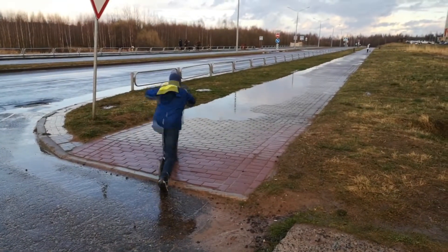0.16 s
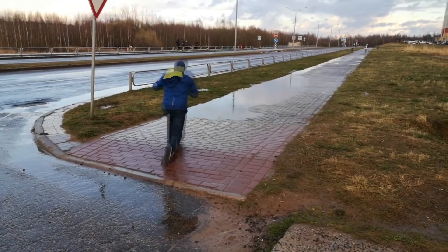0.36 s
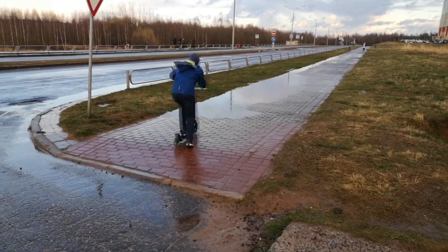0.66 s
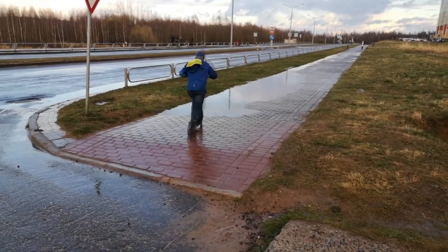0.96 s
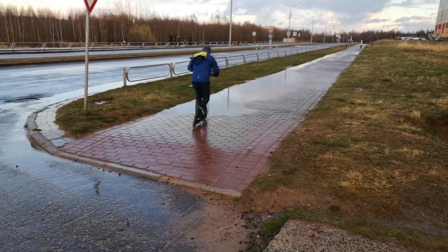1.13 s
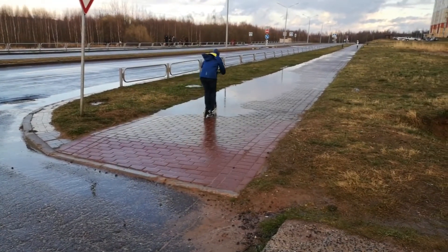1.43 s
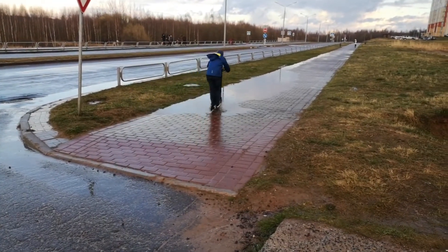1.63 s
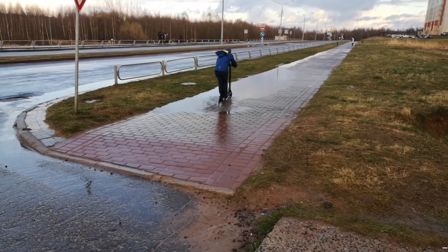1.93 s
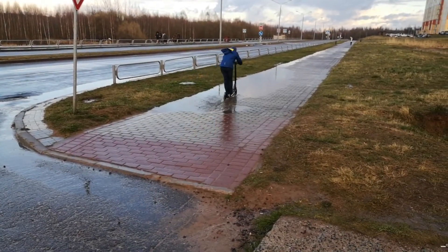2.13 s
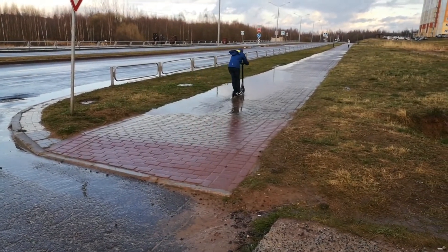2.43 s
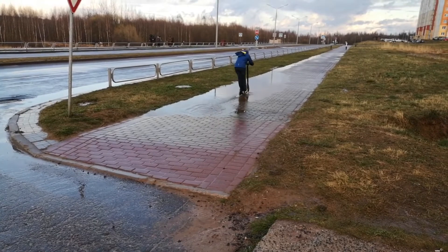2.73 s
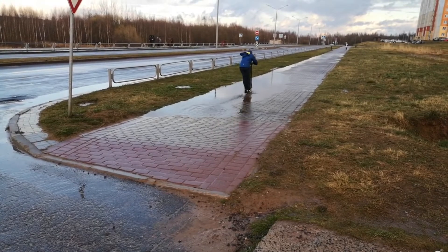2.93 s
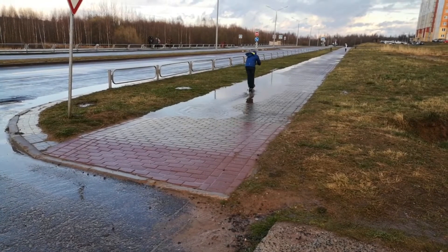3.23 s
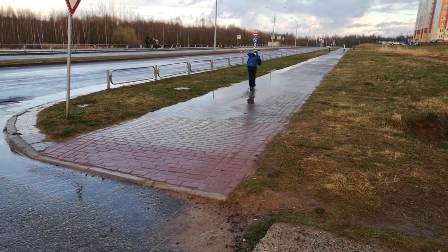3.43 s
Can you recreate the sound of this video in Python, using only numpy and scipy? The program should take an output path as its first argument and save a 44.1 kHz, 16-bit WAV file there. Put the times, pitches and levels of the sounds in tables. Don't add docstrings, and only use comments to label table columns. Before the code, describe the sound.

Kick scooter's small hard wheels rattle over wet paving blocks outdoors, moving away from the microphone

```python
import sys
import numpy as np
from scipy import signal
from scipy.fft import rfft, irfft
from scipy.io import wavfile
from scipy.ndimage import uniform_filter1d

SR = 44100
rng = np.random.default_rng(int(sys.argv[2]) if len(sys.argv) > 2 else 0)


def wav_out(sig):
    wavfile.write(sys.argv[1], SR, np.round(np.clip(np.atleast_2d(sig).T, -1, 1) * 32767).astype(np.int16))


def how_loud(loudness_db):
    steps = np.asarray(loudness_db, float) / 20
    return 10 ** steps


N = 157437
CLICKS_PER_S, CLICK_SCATTER_DB, BIGGEST_CLICK_DB = 3000, 4.5, 11


def curve(table, col):
    rows = np.array(table)
    return np.interp(np.arange(N) / SR, rows[:, 0], rows[:, col])


def shape(table):
    rows = np.array(table)
    log_hz = np.log(np.arange(N // 2 + 1) * SR / N + 1)
    return how_loud(np.interp(log_hz, np.log(rows[:, 0]), rows[:, 1]))


def unit(x):
    return x / np.sqrt(np.mean(x ** 2))


def colour(x, table):
    below = (table[0][0] / 2, table[0][1] - 30)
    above = (table[-1][0] * 2, table[-1][1] - 40)
    return unit(irfft(rfft(x) * shape([below] + list(table) + [above]), N))


def walk(rate_hz):
    hold = int(SR / rate_hz)
    steps = np.repeat(rng.standard_normal(N // hold + 1), hold)
    return 1.3 * uniform_filter1d(uniform_filter1d(steps, hold), hold)[:N]


def clicks(rate_hz, scatter_db):
    hit, sign, size = rng.random((3, 2, N))
    size_db = np.minimum(-scatter_db * np.log(1 - size), BIGGEST_CLICK_DB)
    return unit((hit < rate_hz / SR) * np.sign(sign - .5) * how_loud(size_db))


def treble(x, hz):
    kind = "low" if np.isscalar(hz) else "band"
    return signal.sosfilt(signal.butter(2, hz, kind, fs=SR, output="sos"), x)


# f/Hz, level/dB
AIR = [(200, 34), (650, 18), (1840, -60), (4260, -43), (15000, -6)]


def far_road():
    return colour(rng.standard_normal((2, N)), AIR) * how_loud(-63.5 + walk(2.5))


# f/Hz, level/dB
WIND = [(18, -4), (45, 4), (70, -3.5), (130, -15), (220, -31.5)]
# t/s, level/dB
GUST = [(0, -42), (.07, -54), (.15, -46), (.39, -38.5), (.48, -47), (.55, -41.5), (.88, -37.5),
        (.96, -50.5), (1.27, -36), (1.45, -41.5), (1.8, -45.5), (2.05, -34), (2.14, -48), (2.36, -33),
        (2.45, -49.5), (2.76, -32), (2.92, -34.5), (3.33, -48)]


def wind():
    puffs = colour(rng.standard_normal((2, N)), WIND)
    level = np.sqrt(uniform_filter1d(puffs ** 2, SR // 5))
    return puffs / level * how_loud(curve(GUST, 1) + 2.0 * walk(24.92))


# t/s, level/dB, f/Hz
SINGING = [
    (1.435, -39, 820),
    (2.049, -39, 2470),
    (2.42, -47, 1080),
]


def singing():
    fall_s = 0.011
    t, out = np.arange(N) / SR, 0
    for at, db, hz in SINGING:
        env = (t > at) * np.exp(-np.maximum(t - at, 0) / fall_s)
        scrape = treble(clicks(CLICKS_PER_S, CLICK_SCATTER_DB), [hz / 1.2, hz * 1.2])
        out = out + how_loud(db) * env * unit(scrape)
    return out


def blows(table, cycles, crack_db):
    crack_s, crack_hz = 0.0011, 6000
    out, t = np.zeros((2, N + SR)), np.arange(SR // 8) / SR
    for at, db, hz in table:
        turn = 2 * np.pi * hz * t
        env = np.exp(-hz * t / cycles) * np.minimum(hz * t, 1)
        body = env * np.array([np.sin(turn), np.cos(turn)])
        crack = how_loud(crack_db) * np.exp(-t / crack_s) * rng.standard_normal((2, len(t)))
        i = int(at * SR)
        out[:, i:i + len(t)] += how_loud(db - 6) * (body + treble(crack, crack_hz))
    return out[:, :N]


# t/s, peak level/dB, f/Hz
TICKS = [
    (2.158, -28, 2000),
    (2.26, -23.5, 800),
    (2.696, -27, 1800),
    (2.749, -22, 1200),
    (2.845, -30, 1800),
    (2.296, -33, 8000),
]


def grit_ticks():
    return blows(TICKS, cycles=0.79, crack_db=-5)


# t/s, peak level/dB, f/Hz
THUMPS = [
    (.225, -33, 180),
    (.563, -30, 281),
    (.842, -24.5, 152),
    (.9, -32.5, 133.6),
    (1.26, -34.5, 159),
    (1.4, -37.5, 262.5),
    (1.502, -29.5, 147),
    (1.85, -29, 105),
    (3.139, -40, 197),
]


def deck_thumps():
    return blows(THUMPS, cycles=4.15, crack_db=-60)


# t/s, peak level/dB, f/Hz
KNOCKS = [(0.135, -19, 1904), (0.236, -16.5, 2123), (0.485, -40, 2450), (0.501, -26.5, 1620),
          (0.571, -21.5, 3230), (0.606, -19, 1620), (0.658, -22.5, 3520), (0.689, -22, 3830),
          (0.712, -21.5, 3800), (0.739, -28.5, 2580), (0.804, -32, 5920), (0.91, -18, 4970),
          (1.0, -32, 1760), (1.11, -27, 1720), (1.196, -24, 1550), (1.205, -20, 1840), (1.233, -19, 2470),
          (1.272, -23, 1830), (1.304, -15, 1616), (1.337, -11, 5550), (1.369, -34, 1480),
          (1.408, -20, 1570), (1.432, -27, 845), (1.45, -20, 1540), (1.551, -22, 1750), (1.586, -25, 1570),
          (1.622, -27.5, 2720), (1.644, -22.5, 2705), (1.694, -24, 2660), (1.705, -20, 2000),
          (1.793, -26, 2850), (1.837, -23, 1943), (1.882, -21, 2440), (1.915, -32.5, 1190),
          (1.956, -25, 1900), (2.159, -40, 1610), (2.225, -39, 1780), (2.247, -26.5, 1840),
          (2.258, -34, 1865), (2.297, -37, 1790), (2.309, -36, 1746), (2.346, -33, 2570),
          (2.364, -32, 1870), (2.385, -30, 1880), (2.696, -32.5, 2473), (2.75, -32.5, 1190),
          (2.77, -31, 2530), (2.818, -31, 2470), (2.845, -39, 1860), (2.872, -45, 2650), (3.068, -39, 2560),
          (3.152, -37, 2640), (3.192, -29.5, 1700), (3.516, -29, 1280)]


def edge_knocks():
    return blows(KNOCKS, cycles=5.95, crack_db=-10)


# t/s, rolling level/dB, deck drumming level/dB
ROLL = [(0, -42, -44), (.23, -51, -41.5), (.54, -49.5, -54), (.6, -31, -60), (.76, -37, -49),
        (.89, -56, -33.5), (.96, -47, -46.5), (1.25, -37.5, -40.5), (1.8, -35, -40.5), (2.08, -33.5, -56),
        (2.16, -40.5, -42.5), (2.35, -36.5, -56), (2.85, -37.5, -53), (3.36, -42, -53), (3.57, -40, -44.5)]


def rolling():
    chips_per_s, scatter_db, chip_s, chip_db = 150, 9, 0.0014, -3.5
    hits = np.abs(clicks(chips_per_s, scatter_db)[0])
    chips = unit(signal.lfilter([1], [1, -np.exp(-1 / (chip_s * SR))], hits))
    return how_loud(curve(ROLL, 1) - 4.5) * (how_loud(2.4 * walk(30.0)) + how_loud(chip_db) * chips)


# f/Hz, level/dB
DECK = [(80, -4.5), (125, 2), (200, -7), (290, -9.5), (380, -20)]


def deck(low):
    thud = how_loud(-24.5) * uniform_filter1d(low, int(0.017 * SR))
    drum = how_loud(curve(ROLL, 2) - 9 + 4.2 * walk(10))
    return colour(rng.standard_normal((2, N)), DECK) * (drum + thud)


# f/Hz, level/dB
GRIT = [(500, -16.5), (1600, 6.5), (2900, -5.5), (5500, -1.5), (9300, -5.5), (10200, -9.5), (15000, -30)]


def grit_and_spray(low, bright):
    split_hz, patch_db = 3820, 2.6
    grit = colour(clicks(9000, 3.7), GRIT)
    edges_hz = split_hz * 1.1 ** np.arange(17)
    spray = 0
    for pair in zip(edges_hz, edges_hz[1:]):
        spray = spray + treble(grit, pair) * how_loud(patch_db * walk(90))
    return how_loud(-18) * low * treble(grit, split_hz) + how_loud(-4.5) * bright * unit(spray)


# t/s, peak level/dB, brightness level/dB, rattle length/s
JOLTS = [(0.096, -43, -17, 0.032), (0.132, -21.5, -24, 0.013), (0.16, -28.5, -15.5, 0.055),
         (0.224, -14, -18.5, 0.019), (0.267, -32.5, -28, 0.021), (0.28, -33.5, -12.5, 0.021),
         (0.37, -43, -12, 0.037), (0.448, -31.5, -15, 0.007), (0.499, -27, -18.5, 0.019),
         (0.57, -23, -8, 0.016), (0.608, -18.5, -15.5, 0.014), (0.654, -25.5, -8, 0.014),
         (0.682, -32.5, -0.5, 0.0079), (0.715, -26, -12, 0.0078), (0.737, -25.5, -12, 0.037),
         (0.801, -28.5, -11, 0.022), (0.843, -32, -9, 0.061), (0.878, -30, -15.5, 0.019),
         (0.909, -24, -12.5, 0.014), (1.001, -23, -22, 0.011), (1.06, -27, -12.5, 0.016),
         (1.108, -23.5, -15, 0.014), (1.153, -26.5, -9, 0.015),
         (1.194, -17, -17.5, 0.0093), (1.203, -18.5, -12.5, 0.0062), (1.232, -11.5, -16.5, 0.011),
              (1.269, -16.5, -13, 0.0093), (1.304, -8.5, -17.5, 0.0077), (1.338, -19.5, -9.5, 0.009),
              (1.367, -15, -18, 0.0056), (1.405, -14.5, -13, 0.0066), (1.43, -19, -16, 0.0094),
              (1.447, -23.5, -19.5, 0.012), (1.509, -32.5, -17, 0.046), (1.552, -18.5, -14, 0.014),
              (1.586, -19.5, -19.5, 0.02), (1.619, -17.5, -22.5, 0.016), (1.642, -12.5, -15.5, 0.0099),
              (1.689, -20.5, -19, 0.008), (1.695, -17.5, -10, 0.0063), (1.703, -14.5, -21, 0.014),
              (1.755, -26.5, -11.5, 0.014), (1.791, -18, -13.5, 0.0074), (1.836, -16.5, -16.5, 0.003),
              (1.881, -15.5, -13.5, 0.0066), (1.913, -42, 4, 0.0088), (1.954, -29, -10, 0.02),
              (1.986, -20.5, -14, 0.011), (2.039, -20, -17, 0.0078), (2.157, -26.5, -14, 0.0027),
         (2.226, -30.5, -6.5, 0.0079), (2.247, -32.5, -14, 0.022), (2.295, -32.5, -7.5, 0.023),
             (2.345, -31.5, -15.5, 0.0164), (2.383, -36.5, -12, 0.0065), (2.56, -29.5, -12.5, 0.0088),
             (2.641, -37, -16.5, 0.025), (2.693, -29, -21, 0.015), (2.746, -28.5, -27, 0.0039),
             (2.772, -37, -8.5, 0.017), (2.819, -31.5, -4, 0.0038), (2.872, -31, -13.5, 0.016),
             (3.15, -26.5, -16, 0.0066), (3.192, -25, -21.5, 0.0086), (3.47, -19, -20, 0.002),
             (3.509, -22.5, -54, 0.0045)]


def jolts():
    attack_s, fall_power = .0012, 1.3
    bright_attack_s, bright_fall_power = .0025, 1.44
    tail_db, tail_s = -21, 0.047
    low, bright, new = np.zeros(N), np.zeros(N), np.zeros(N, int)
    t = np.arange(SR // 5) / SR
    tail = how_loud(tail_db) * np.exp(-t / tail_s)
    for at, db, bright_db, length_s in JOLTS:
        i, age = int(at * SR), t / max(length_s, .002)
        knock = (1 - np.exp(-t / attack_s)) * (np.exp(-age ** fall_power) + tail)
        bright_fall = np.exp(-(age / 1.03) ** bright_fall_power)
        jingle = (1 - np.exp(-t / bright_attack_s)) * (bright_fall + tail)
        low[i:i + len(t)] += how_loud(db) * knock[:N - i]
        bright[i:i + len(t)] += how_loud(db + bright_db) * jingle[:N - i]
        new[i] = 1
    settlings = np.arange(N) // (SR // 20)
    return low, bright, np.cumsum(new) + settlings


def ring(env, modes, which):
    mode_scatter_db, together, longest_t60_s = 3, 0.24, .06
    luck = rng.standard_normal((512, len(modes)))
    taps, out = clicks(CLICKS_PER_S, CLICK_SCATTER_DB), 0
    for k, (hz, db, t60_s) in enumerate(modes):
        r = np.exp(-np.log(1000) / (min(t60_s, longest_t60_s) * SR))
        poles = [1, -2 * r * np.cos(2 * np.pi * hz / SR), r * r]
        gain = how_loud(db + mode_scatter_db * luck[which, k]) * np.sqrt(1 - r) * env
        own = np.roll(taps, (k + 1) * (N // 20), axis=1)
        out = out + signal.lfilter([1, 0, -1], poles, gain * (together * taps + own))
    return out


# f/Hz, level/dB, t60/s
AXLE = [(1200, -29.5, .03), (2650, -32, 0.042)]
# f/Hz, level/dB, t60/s
FRAME = [(853, -20.5, 0.028), (961, -15, 0.018), (1128, -9, 0.014), (1340, -37, 0.012),
         (1670, -17.5, 0.053), (1785, -13, 0.072), (1887, -6, 0.011), (2234, -11, 0.032),
         (2445, -8.5, 0.014), (2685, -22, 0.0825), (3140, -19, 0.062), (3190, -22, 0.025),
         (3430, -16.5, 0.05), (3800, -24, 0.092)]
# f/Hz, level/dB, t60/s
BOLTS = [(4970, -21, 0.047), (5134, -12, 0.026), (5270, -4.5, 0.0095), (5680, -7, 0.033),
         (6540, -13, 0.019), (7460, -4, 0.0043)]


def scooter():
    low, bright, which = jolts()
    roll = rolling()
    low, bright = low + roll, bright + how_loud(-19.0) * roll
    axle = ring(roll, AXLE, which)
    frame = how_loud(-19.5) * ring(low, FRAME, which)
    bolts_db = -7.5 - 0.45 * np.arange(N) / SR
    bolts = how_loud(bolts_db) * ring(bright, BOLTS, which)
    return axle + frame + bolts + grit_and_spray(low, bright) + deck(low)


def port(peaks, lag_s):
    f, out = np.arange(N // 2 + 1) * SR / N, 1
    for hz, width_hz, db in peaks:
        damping = 1j * f * width_hz
        out = out * (1 + (how_loud(db) - 1) * damping / (hz ** 2 - f ** 2 + damping))
    return out * np.exp(-2j * np.pi * f * lag_s)


# f/Hz, side level/dB
SPREAD = [(40, -22), (250, -17), (550, 1), (1200, -14), (2500, -7), (8000, -8), (12000, -1)]
# f/Hz, width/Hz, boost level/dB
LEFT_PORT = [(770, 200, 5), (2670, 240, 10), (3300, 500, 4), (8300, 1200, 4)]
RIGHT_PORT = [(1780, 390, 1.7), (6000, 100, 1.3), (14000, 9200, 5.35)]


def scene():
    outdoors = far_road() + wind()
    struck = singing() + grit_ticks() + deck_thumps() + edge_knocks()
    mid, side = rfft(outdoors + struck + scooter())
    side = side * shape(SPREAD)
    left = (mid + side) * port(LEFT_PORT, lag_s=0)
    right = (mid - side) * port(RIGHT_PORT, lag_s=.00005)
    return irfft(np.array([left, right]), N)


def top_cut(x):
    return signal.sosfilt(signal.butter(12, 16330, fs=SR, output="sos"), x)


def record(dry):
    top = signal.ellip(6, .3, 40, 15200, fs=SR, output="sos")
    return top_cut(signal.sosfilt(top, dry))


dry = scene()
out = record(dry)
wav_out(out)
```